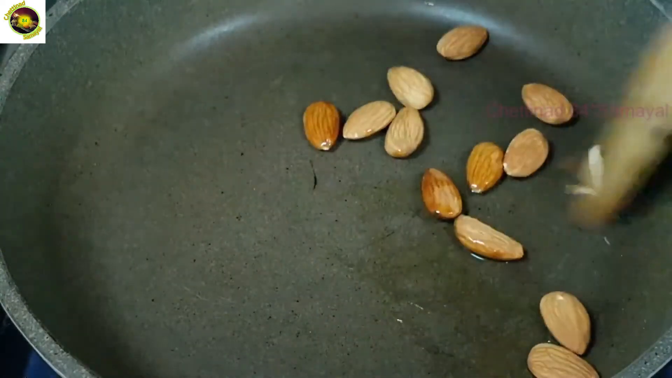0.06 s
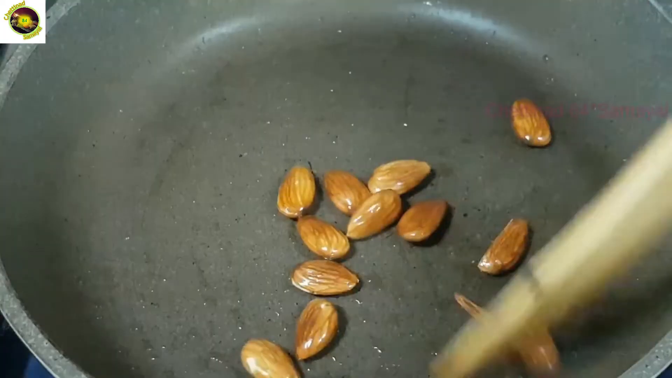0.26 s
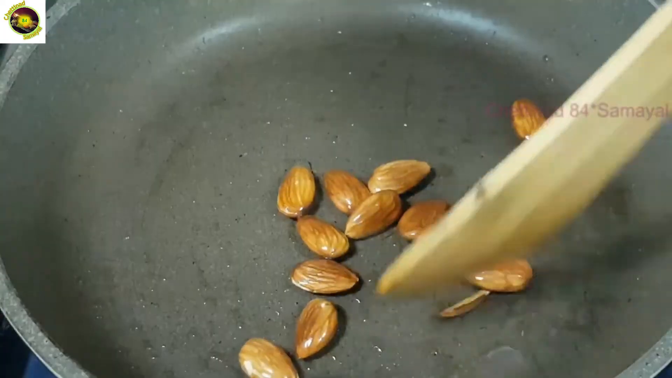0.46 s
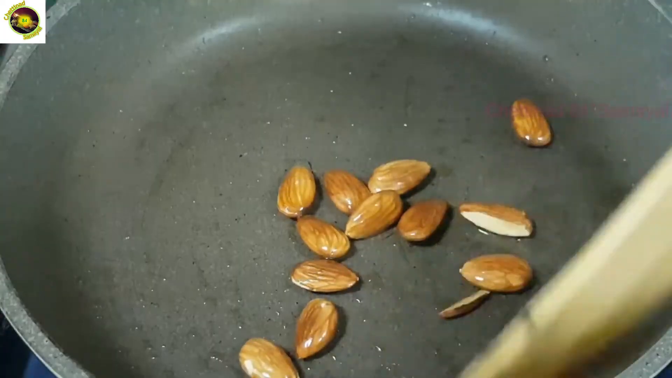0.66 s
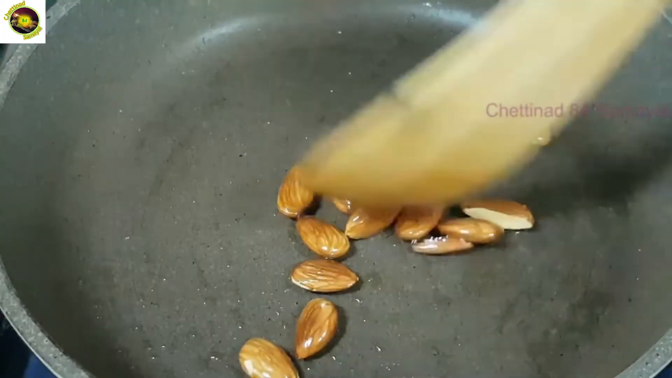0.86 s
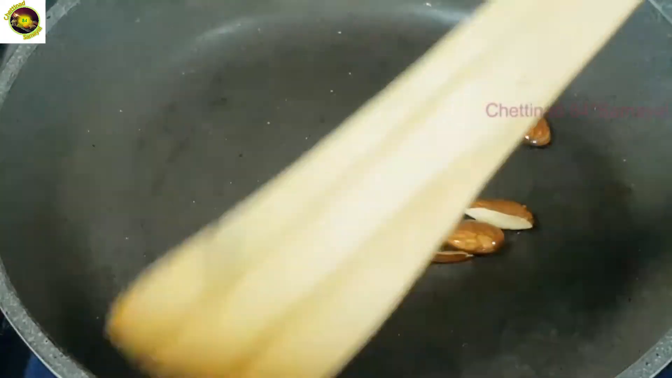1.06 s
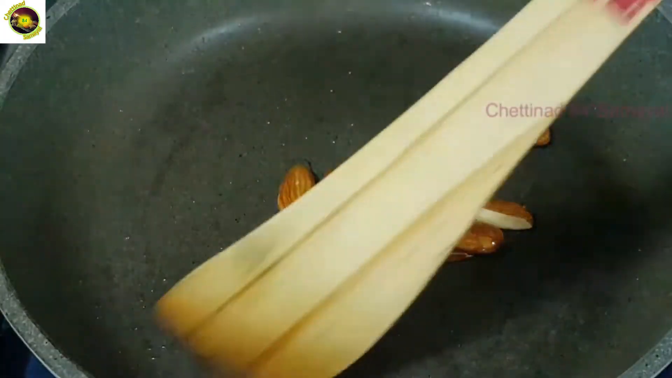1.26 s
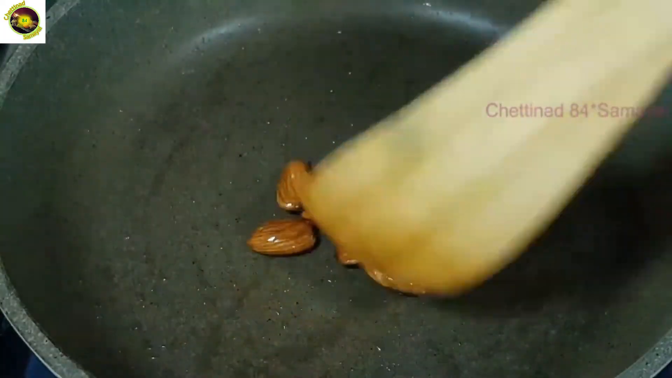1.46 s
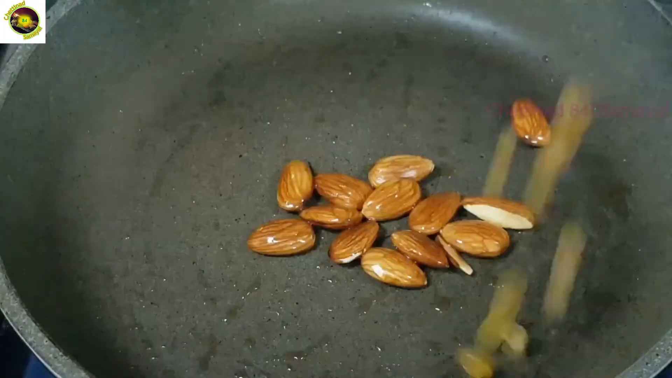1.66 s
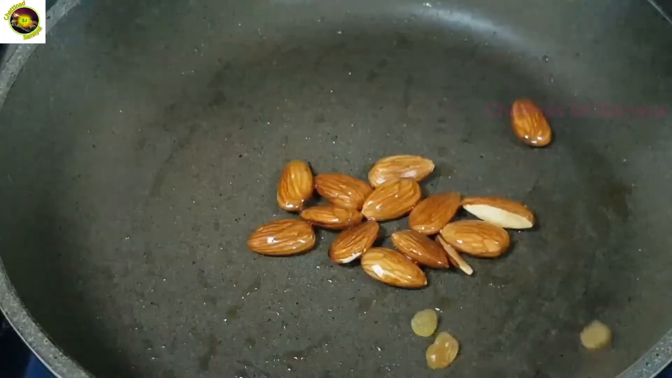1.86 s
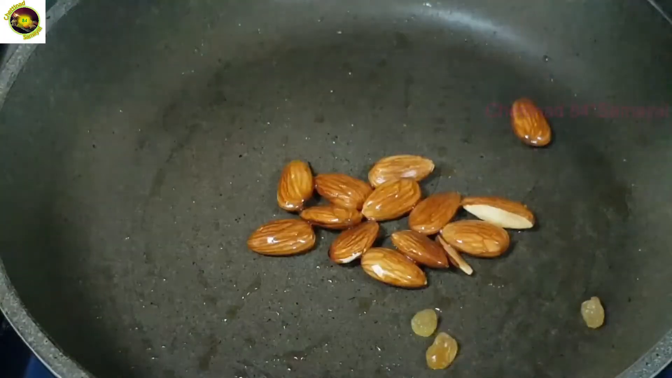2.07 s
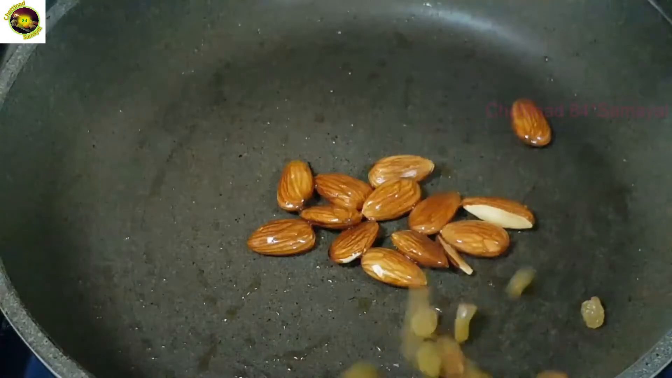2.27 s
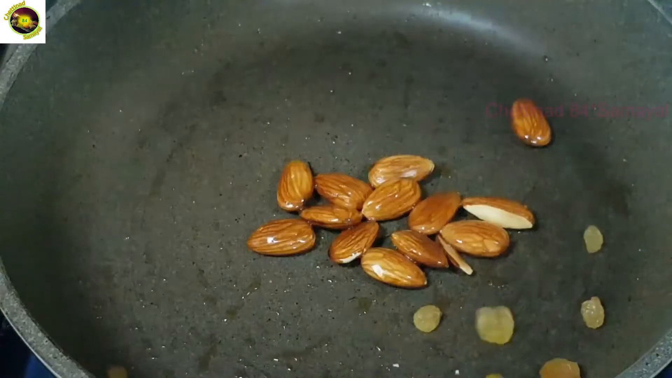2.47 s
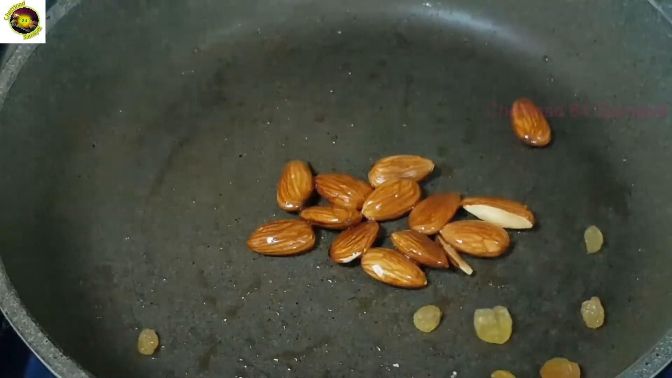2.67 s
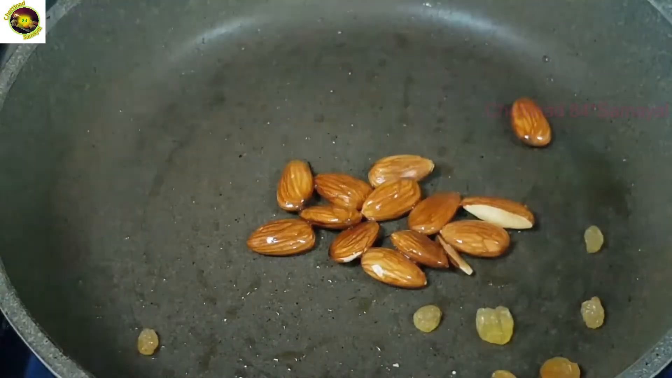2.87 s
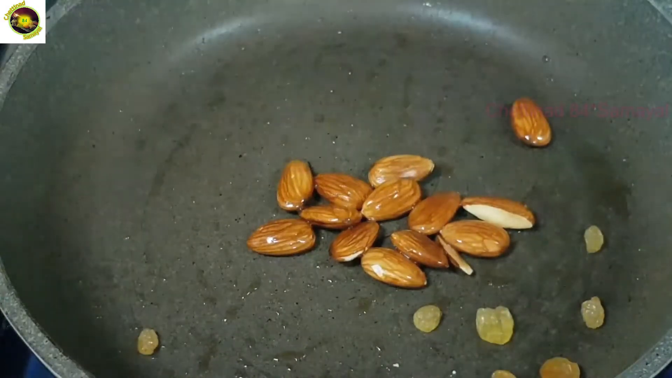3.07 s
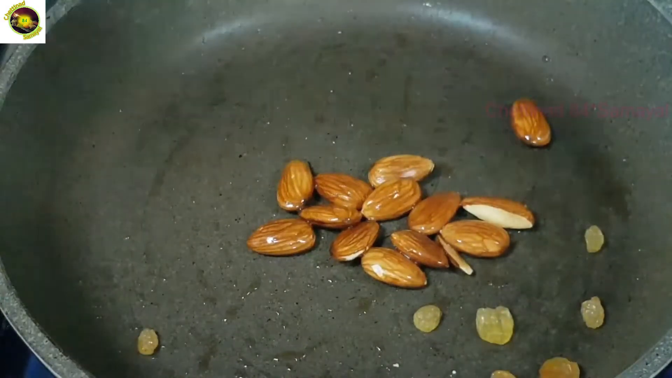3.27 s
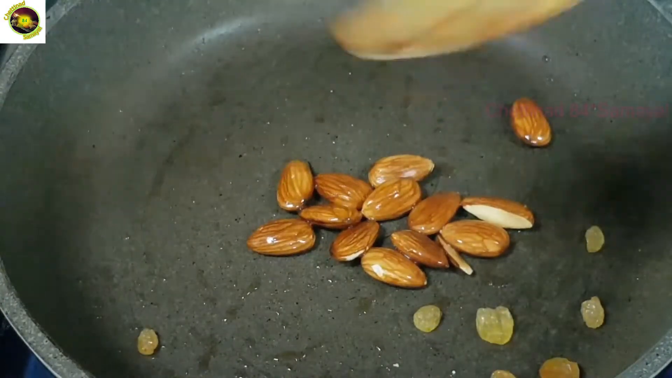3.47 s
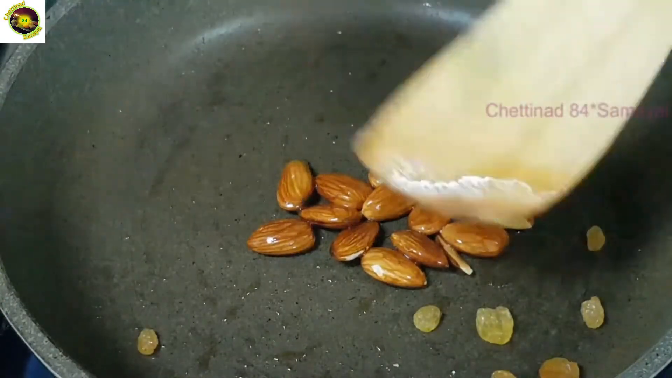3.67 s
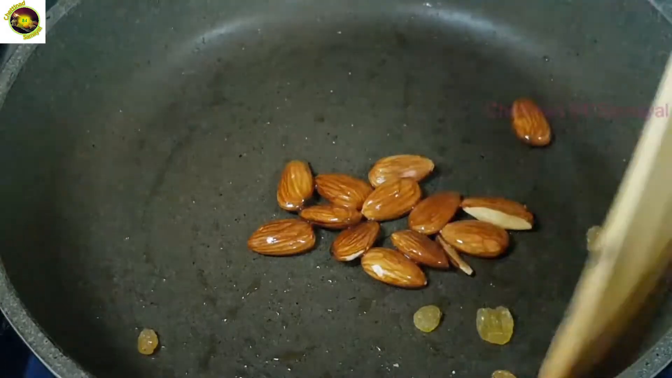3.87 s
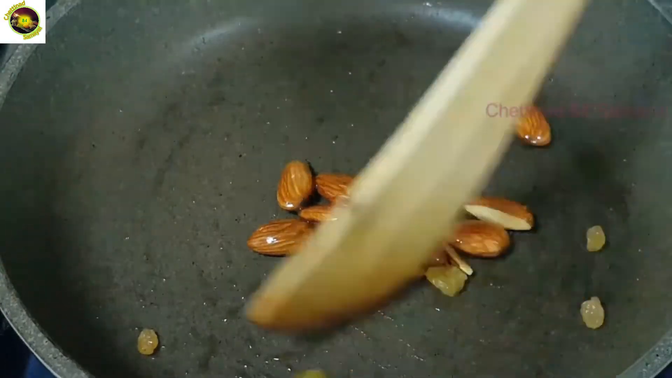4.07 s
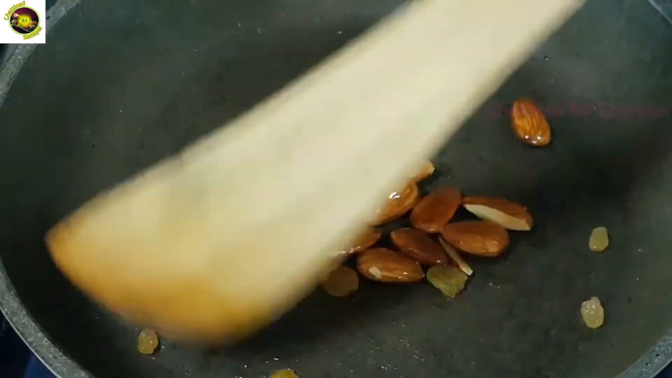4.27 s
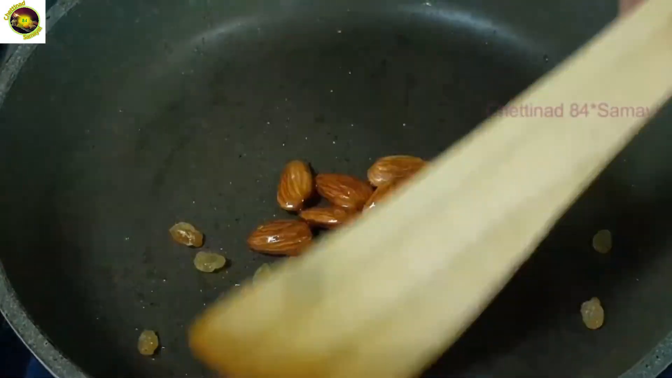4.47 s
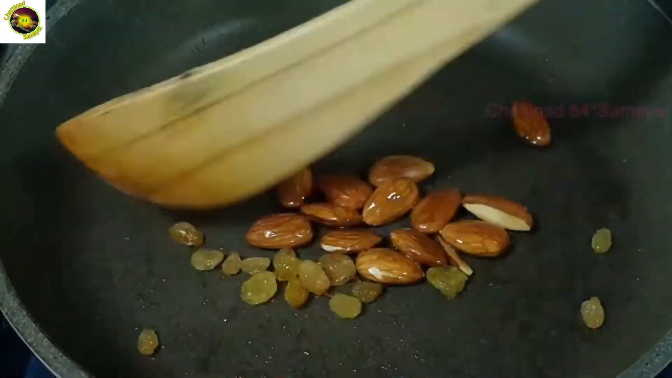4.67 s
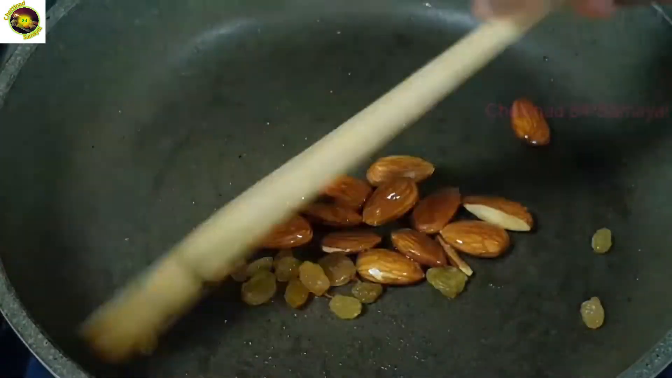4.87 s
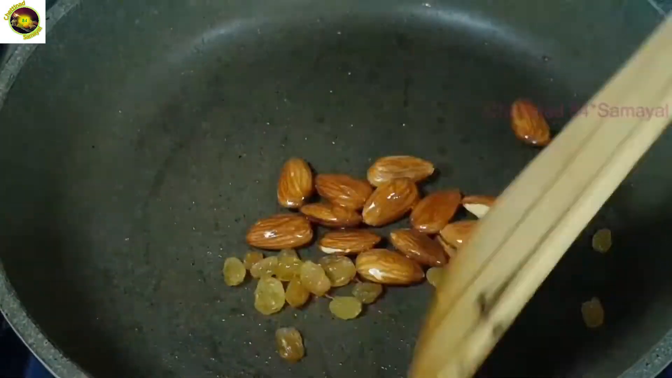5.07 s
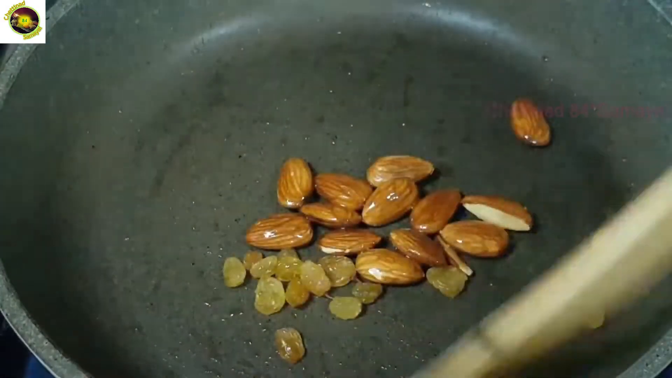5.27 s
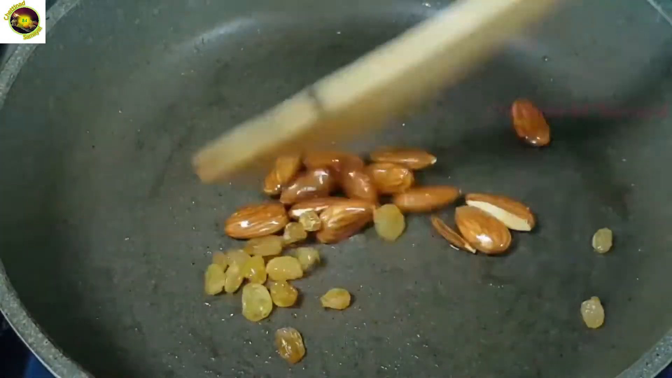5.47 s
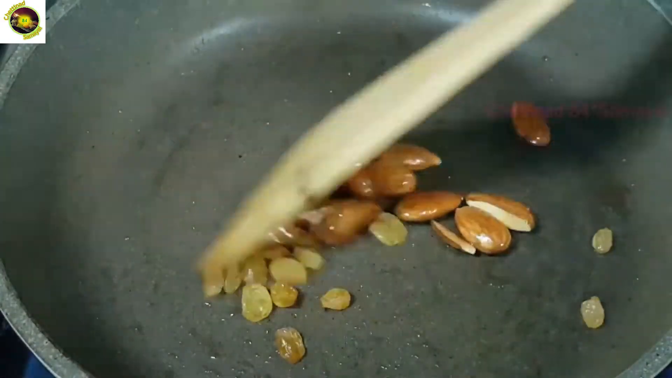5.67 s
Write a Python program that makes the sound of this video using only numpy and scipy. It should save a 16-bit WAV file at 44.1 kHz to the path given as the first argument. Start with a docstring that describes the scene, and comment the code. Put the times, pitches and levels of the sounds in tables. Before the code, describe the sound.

Close in a small kitchen, wood clacks and rasps on a resonant metal pan, small dried fruit drops, and hot fat ticks and fizzes.

```python
"""A small hard-walled kitchen, close on a thin frying pan: a wooden spatula knocks and scrapes,
almonds tumble and raisins drop in. Every contact rings the pan's decaying modes; uneven slips
make the scraping, filtered noise the sizzling fat, short high ticks the spitting in it.
A diffuse echo, faintly wavering air noise and mains hum make the place; the level dips briefly twice."""
import sys
import numpy as np
from scipy import signal
from scipy.fft import rfft, irfft
from scipy.io import wavfile
from scipy.ndimage import uniform_filter1d

SR = 44100
rng = np.random.default_rng(int(sys.argv[2]) if len(sys.argv) > 2 else 0)


def master_out(mix):
    """Clip the mix to full scale and print it as 16-bit PCM to the path in sys.argv[1]."""
    frames = np.transpose(np.atleast_2d(mix))
    ceiling = np.clip(frames, -1, 1)
    pcm = np.round(ceiling * 32767).astype(np.int16)
    wavfile.write(sys.argv[1], SR, pcm)


def gain_from_db(level_db):
    """Convert decibel levels to linear amplitude factors (20 dB per decade)."""
    decades = np.asarray(level_db, float) / 20
    return 10 ** decades


N = 251811
T = np.arange(N) / SR

# modes of the free pan: f/Hz, level/dB, t60/s
PAN = [(329.4, -19, 0.17), (383.4, -6, 0.43), (558, -20.5, 0.23), (728, -14.5, 0.14), (892, -14, 0.056),
       (932.7, -1.5, 0.29), (1023, -8, 0.076), (1029.5, -7.5, 0.051), (1401.5, -8.5, 0.1),
       (1632, -5, 0.068), (1800, -0.5, 0.24), (1896, -9.5, 0.18), (2428, -8, 0.055), (2772, -9, 0.27),
       (2869, -2.5, 0.087), (3700, -5, 0.064), (4230, -11.5, 0.63), (4540, -29, 0.26), (4630, -1, 0.08),
       (5840, -12, 0.16), (6160, -12, 0.19), (7570, -10.5, 0.25), (8500, -6, 0.1), (9150, -17, 0.088),
       (10110, -6.5, 0.045), (11700, -7.5, 0.13), (13100, -25, 0.11), (13300, -12, 0.049)]
# parts of the pan's range over which a blow shares out, by where it lands: f/Hz
STRIKE_HZ = [360, 935, 1800, 2850, 5000]
# raisins drop in and bounce: t/s, strength/dB, hardness/(dB/octave),
# change of the 935 Hz part/dB (weak near the rim)
DROPS = [(1.643, -65, 1.5, -12), (1.712, -58, 6, 10), (1.763, -43, -0.5, -10), (1.77, -54, 4.5, 1),
         (1.796, -51.5, 0, -9), (1.804, -36.5, -2, -1.5), (1.817, -54, 1.5, -2), (1.849, -55, 3.5, -10),
         (1.88, -49, 0, -4), (2.298, -40.5, 1.5, 2.5), (2.316, -45.5, 2, -1), (2.372, -49, 4, 5),
         (2.392, -61, 1.5, 12), (2.416, -54.5, 0.5, -3), (2.447, -66.5, 7.5, 9)]


def level(x, db):
    """Scale to an rms in dB."""
    return x * gain_from_db(db) / np.sqrt(np.mean(x ** 2))


def colour(x, points):
    """Causal filter from (Hz, dB) points, by the folded cepstrum."""
    hz, db = np.transpose(points)
    grid = np.linspace(1, SR / 2, 2049)
    cep = irfft(np.log(gain_from_db(np.interp(np.log(grid), np.log(hz), db))))
    cep[1:2048] *= 2
    cep[2049:] = 0
    return signal.fftconvolve(x, irfft(np.exp(rfft(cep))))[:len(x)]


def band(x, lo_hz, hi_hz):
    """Band-pass."""
    edges_hz = [lo_hz, min(hi_hz, .45 * SR)]
    return signal.sosfilt(signal.butter(2, edges_hz, "band", fs=SR, output="sos"), x)


def grains(per_s, spread_db):
    """Random clicks of either sign, a few much bigger than the rest."""
    chance = rng.random((3, N))
    happens = chance[0] < per_s / SR
    size_db = np.minimum(-spread_db * np.log(1 - chance[2]), 22)
    return happens * np.sign(chance[1] - .5) * gain_from_db(size_db)


def walk(rate):
    """Slowly wandering value, spread near 1, from random steps (rate per second) smoothed twice."""
    k = int(SR / rate)
    steps = np.repeat(rng.standard_normal(N // k + 1), k)
    return 1.5 * uniform_filter1d(uniform_filter1d(steps, k), k)[:N]


def add(out, s, x):
    """Mix x into out from time s."""
    i = int(s * SR)
    out[i:i + len(x)] += x[:N - i]


def strokes():
    """Gains of rasp, rumble and swish: each stroke of the spatula rises, holds and dies away."""
    # spatula edge dragged over the pan: t/s, length/s, rasp level/dB, rumble level/dB,
    # level of the swish of pushed fat/dB
    drags = [(0, 0.017, -68, -60, -79), (0.373, 0.11, -47.5, -55.5, -93), (.72, 0.08, -66, -69, -65.5),
             (1.195, 0.13, -72, -65.5, -59.5), (1.36, 0.088, -52, -63, -94), (3.922, 0.075, -59, -70, -64),
             (4.019, 0.18, -57, -53, -70.5), (4.483, 0.16, -51.5, -51.5, -67.5),
             (4.89, .17, -57.5, -57.5, -57), (5.076, 0.19, -56.5, -46.5, -68.5),
             (5.313, 0.078, -56.5, -49.5, -64), (5.44, 0.097, -51.5, -46, -75),
             (5.677, 0.049, -48.5, -35, -75)]
    # rise of rasp, rumble, swish: time/s
    attack_s = [0.027, 0.046, 0.023]
    # dying away of rasp, rumble, swish: time constant/s
    release_s = [0.048, 0.036, 0.046]
    gains, t = np.zeros((3, N)), T[:int(.7 * SR)]
    for s, length, *levels_db in drags:
        for gain, db, attack, release in zip(gains, levels_db, attack_s, release_s):
            rise = np.clip(t / attack, 0, 1)
            fall = np.exp(-np.maximum(t - length, 0) / release)
            add(gain, s, gain_from_db(db) * rise * fall)
    return gains


def scrape():
    """The edge sticks and slips: a rasp that rings the pan, a fat swish, a rumble of floor and grate."""
    # colour of the bare rasp: f/Hz, level/dB
    rasp_colour = [(180, -58.5), (300, -0.5), (785, -6.5), (925, -4.5), (1230, -4.5), (1840, -18.5),
                   (1920, -12.5), (3460, -34.5), (8000, -44.5), (10400, -93), (17600, -120)]
    # faint rasp, rumble and swish that stay between strokes: level/dB
    idle_db = [-72, -71, -72]
    ring_db, tilt_db = -3, -6  # ring level, and its tilt per octave about 935 Hz
    grate_hz, floor_hz = 140, 322

    rasp_gain, rumble_gain, swish_gain = strokes() + gain_from_db(np.array(idle_db))[:, None]
    judder_db = 2.2 * walk(30)
    slips = level(grains(2500, 3.96), 0) * rasp_gain * gain_from_db(judder_db)
    rasp = gain_from_db(18.0) * colour(slips, rasp_colour)

    # one two-pole resonator for each mode
    ring = np.zeros(N)
    for hz, db, t60 in PAN:
        r = np.exp(-np.log(1000) / (t60 * SR))
        angle = 2 * np.pi * hz / SR
        gain = gain_from_db(db + tilt_db * np.log2(hz / 935)) * np.sqrt(1 - r) * np.sin(angle)
        ring += gain * signal.lfilter([1], [1, -2 * r * np.cos(angle), r * r], slips)

    shake = rng.standard_normal(N) * rumble_gain * gain_from_db(1.4 * walk(25))
    rumble = gain_from_db(18.0) * band(shake, 0.64 * grate_hz, 1.374 * grate_hz)
    rumble += gain_from_db(8.5) * band(shake, 161, 256)
    rumble += gain_from_db(22) * band(shake, floor_hz - 14, floor_hz + 14)

    swish = level(band(grains(4000, 1.1), 790, 2140), 1.7) * swish_gain * gain_from_db(2.0 * walk(25.14))
    return rasp + gain_from_db(ring_db) * ring + rumble + swish


def fat():
    """Tiny bubbles sizzle; short high ticks pop, echo off the pan wall and leave a crackling fizz."""
    # swell of the frying fat: t/s, level/dB
    sizzle = [(0, -69), (.43, -71), (1.17, -72), (1.35, -66), (1.69, -70), (2.0, -71), (2.35, -65),
              (2.62, -78), (2.73, -56), (2.771, -60), (2.95, -78), (3.15, -74), (3.32, -67), (3.37, -57),
              (3.55, -76), (3.78, -61.5), (3.86, -63), (3.97, -64.5), (4.26, -62), (4.43, -62),
              (4.55, -65.5), (4.82, -63), (5.09, -58.5), (5.3, -69), (5.38, -54), (5.48, -68), (5.71, -61)]
    # colour of the bubbles: f/Hz, level/dB
    fat_colour = [(1760, -9), (3000, 1), (5090, 1), (6300, -2), (8580, 4), (9320, 1), (12400, 6),
                  (14900, 2.5), (15500, 8)]
    # short high ticks: bursting drops of water, and at 2.447 s a raisin's bright tap:
    # t/s, pop level/dB, centre f/Hz, after-fizz level against the pop/dB
    ticks = [(0.3092, -50, 8640, -24), (0.5435, -42, 8500, -37), (0.642, -44, 8400, -41),
             (0.9214, -45, 8400, -35), (1.035, -48, 7780, -31), (1.1298, -51, 8670, -33),
             (1.3553, -36.5, 6210, -12), (1.6457, -35, 8200, -20), (1.693, -45, 8500, -14),
             (1.9867, -48, 8500, -18), (2.153, -34.5, 13200, -32), (2.4469, -34, 8600, -15),
             (2.4705, -20, 12600, -23.5), (2.6206, -40.5, 8600, -21), (2.655, -16.5, 8750, -25),
             (2.6664, -39, 10800, -26), (2.697, -30, 8300, -19.5), (2.7426, -19, 9700, -17),
             (2.848, -42, 11000, -27), (2.871, -46, 12000, -33), (3.003, -42, 11000, -29),
             (2.9476, -37, 13400, -27), (2.9846, -48, 13700, -21), (3.097, -48, 12400, -27),
             (3.1323, -40.5, 12700, -26), (3.2131, -42.5, 12200, -18.5), (3.3388, -53.5, 9040, -6.5),
             (3.3643, -39, 8280, -21), (3.4094, -47, 8090, -24), (3.471, -36, 13900, -19),
             (3.48, -44, 12600, -13), (3.683, -39.5, 8270, -21.5), (3.7963, -35, 13300, -13),
             (3.8054, -26.5, 7300, -37), (3.8368, -35, 5100, -27), (3.8556, -41, 11500, -12),
             (3.9444, -41, 8470, -24), (4.0456, -34, 11700, -21), (4.0932, -30.5, 11800, -38),
             (4.3138, -26, 12000, -38.5), (4.475, -28.5, 13100, -21), (4.5186, -26.5, 14800, -27),
             (4.591, -45, 10900, -28), (4.7531, -36, 12330, -35), (4.7955, -44, 8800, -13.5),
             (4.9216, -27.5, 12300, -45), (5.098, -31.5, 13020, -19.5), (5.1754, -35.5, 8900, -15),
             (5.2655, -33.5, 12600, -26), (5.332, -45, 8050, -11), (5.453, -36, 11700, -19),
             (5.5479, -39.5, 8700, -17.5), (5.5832, -32, 13100, -24)]
    pop_s, thud_s, thud_db = .00007, 0.000096, -12
    ping_s, ping_db = 0.00043, -17
    echo_s, echo_db = 0.0037, -14
    fizz_s, hiss_s, hiss_db = 0.011, 0.11, -14  # quick fizz, and its longer hiss
    raisin_fizz_s, raisin_fizz_db = 0.048, -19  # against the raisin's strength

    s, db = np.transpose(sizzle)
    bubbles = level(rng.standard_normal(N), 0) + level(grains(500, 4.9), -3.6)
    bubbles = level(colour(bubbles, fat_colour), 0)
    flicker_db = 1.5 * walk(20)
    pops, fizz_gain, t = np.zeros(N), np.zeros(N), T[:int(.4 * SR)]
    for at, pop_db, hz, fizz_db in ticks:
        tone = np.sin(2 * np.pi * hz * t)
        pop = np.exp(-(t / pop_s - 2) ** 2) * tone
        pop -= gain_from_db(thud_db) * np.exp(-t / thud_s)
        pop += gain_from_db(ping_db) * np.exp(-t / ping_s) * tone
        add(pops, at, gain_from_db(pop_db) * pop)
        add(pops, at + echo_s, gain_from_db(pop_db + echo_db) * pop)
        decay = np.exp(-t / fizz_s) + gain_from_db(hiss_db) * np.exp(-t / hiss_s)
        add(fizz_gain, at, gain_from_db(pop_db + fizz_db) * decay)
    # moist raisins fizz in the fat
    for at, drop_db, *_ in DROPS:
        add(fizz_gain, at, gain_from_db(drop_db + raisin_fizz_db) * np.exp(-t / raisin_fizz_s))
    # fat pushed by the spatula sizzles up with the swish
    fizz_gain += strokes()[2]
    sizzle_gain = gain_from_db(np.interp(T, s, db) + flicker_db)
    return bubbles * (sizzle_gain + fizz_gain) + band(pops, 560, 17600)


def kitchen():
    """Faintly wavering air noise, as coloured noise, and a mains hum, as a wavering sine."""
    # colour of the air noise: f/Hz, level/dB
    air_colour = [(12, 2), (20, 12), (31, 5.5), (49, -11), (102, -14), (147, -33), (237, -25), (372, -7),
                  (634, -6.5), (709, 1), (794, -10.5), (5210, -26), (13200, -25), (15200, -26),
                  (16500, -41)]
    air_db, hum_hz, hum_db = -64, 99.5, -71.5
    air = level(colour(rng.standard_normal(N), air_colour), air_db) * gain_from_db(.8 * walk(6))
    hum = gain_from_db(hum_db + 2.0 * walk(17)) * np.sin(2 * np.pi * hum_hz * T)
    return air + hum


def contacts():
    """Every blow as time, level in each part of the pan's range, crack, ring share and rattle."""
    # spatula and nuts knock the pan: t/s, strength/dB, rocking of the whole pan/dB,
    # hardness/(dB/octave), wood crack level/dB
    knock_table = [(.061, -49, -67, -10, -66), (.074, -36, -75, 1, -68), (.174, -36.5, -63, -1.5, -53),
                   (.189, -31.5, -57, -10, -56), (.383, -51, -66, 8, -67), (.394, -26.5, -42.5, 2, -36),
                   (.46, -32, -55, -1.5, -64), (.703, -35.5, -45.5, -1, -40.5), (.855, -62, -84, 6, -48),
                   (0.8594, -43.5, -77, 6, -37), (1.193, -30.5, -32, 2, -25.5), (1.338, -46, -44, 4, -50),
                   (1.383, -29.5, -47, 2.5, -54), (1.439, -44, -46, 4, -52), (3.931, -34.5, -42.5, -4, -41),
                   (4.05, -35, -43, -7, -48), (4.119, -26, -41.5, 0, -44), (4.231, -45.5, -63, -18, -76),
                   (4.291, -49, -64, -17, -62), (4.435, -26, -37, 3.5, -32.5), (4.526, -37.5, -39, 1, -67),
                   (4.583, -26, -43, 2.5, -50), (4.639, -34, -59, -9, -65), (4.746, -48, -65, -10, -77),
                   (4.86, -49, -50.5, -3, -53), (4.896, -30, -37, 1, -34.5), (5.13, -25.5, -43, 1, -52),
                   (5.192, -37.5, -50, -5, -52), (5.239, -51, -71, 14, -43.5),
                   (5.332, -23.5, -41.5, -7.5, -34.5), (5.409, -51, -46, -13, -47),
                   (5.435, -25.5, -41, 2.5, -49), (5.488, -27.5, -58, -19, -58),
                   (5.599, -42.5, -67, -6, -59), (5.68, -24.5, -72, 8, -23)]
    # share of a knock above the rocking part, dull like the spatula edge: level/dB
    knock_share_db = [-0.5, -10, -20.5, -45.5]
    # share of a falling raisin, small and bright: level/dB
    drop_share_db = [-1.5, 2, -0.5, -10.5]
    knock_ring, drop_ring = 0.75, 1.1  # share of the free ring time
    knock_rattle_db, drop_rattle_db = -15, -6  # against the crack
    drop_rock_db, drop_crack_db = -20.5, -6  # against the raisin's strength

    octaves = np.log2(np.array(STRIKE_HZ[1:]) / STRIKE_HZ[1])
    hits = []
    for s, db, rock_db, hard, crack_db in knock_table:
        upper_db = db + np.array(knock_share_db) + hard * octaves
        hits.append((s, [rock_db, *upper_db], crack_db, knock_ring, knock_rattle_db))
    for s, db, hard, spot_db in DROPS:
        upper_db = db + np.array(drop_share_db) + hard * octaves + [spot_db, 0, 0, 0]
        parts_db = [db + drop_rock_db, *upper_db]
        hits.append((s, parts_db, db + drop_crack_db, drop_ring, drop_rattle_db))
    return hits


def blows():
    """Each blow rings all modes in its own colour, mostly damped later; the wood cracks and rattles."""
    # sudden changes of the ringing level, mostly damped by the spatula, sometimes louder:
    # t/s, change/dB
    ring_changes = [(.145, -21), (.26, -19), (.495, -13), (.73, 0), (.774, -9), (.867, -4), (1.235, 5.5),
                    (1.394, -3), (3.96, -4.5), (4.133, -4), (4.478, -16), (4.596, -12.5), (4.653, -22),
                    (4.929, -18), (5.143, -7), (5.372, -25), (5.447, -1.5), (5.531, 3), (5.56, -18.5)]
    # modes of the wooden spatula: f/Hz, level/dB, t60/s
    spatula = [(780, -40, 0.1), (1220, -13, 0.1), (1515, -5.5, 0.049), (2083, -11, 0.028),
               (2360, -18, 0.023), (3500, -40, 0.016)]
    scatter_db, detune = 2.05, 0.0021  # random spread of each mode's level and relative pitch
    rough_db, flutter = 3.0, .03  # waver depth at 4 kHz, and waver rate per Hz of the mode
    rise_s, change_s, crack_s, rattle_s = 0.00097, 0.0018, 0.0051, 0.074
    crack_gain_db, knock_db = 6, -4  # the wood's knock is set against its crack

    out, t = np.zeros(N), T[:int(.3 * SR)]
    knock_t = t[:2048]
    hz, db, t60 = np.transpose(PAN)[:, :, None]
    # each ring wavers at random in level, the higher the faster and deeper
    waver = np.array([gain_from_db(rough_db * np.sqrt(f / 4000) * walk(flutter * f)) for f in hz[:, 0]])
    knock = np.zeros(len(knock_t))
    for f, g, d in spatula:
        knock += gain_from_db(g) * np.exp(-np.log(1000) * knock_t / d) * np.sin(2 * np.pi * f * knock_t)

    for s, parts_db, crack_db, ring, rattle_db in contacts():
        chance = rng.standard_normal((2, len(PAN), 1))
        noise = rng.standard_normal(len(t))
        share_db = np.interp(np.log(hz), np.log(STRIKE_HZ), parts_db)
        size = gain_from_db(db + share_db + scatter_db * chance[0])
        decay = np.exp(-np.log(1000) * t / (t60 * ring))
        i = min(int(s * SR), N - len(t))
        phase = 2 * np.pi * hz * (1 + detune * chance[1]) * t
        modes = size * decay * waver[:, i:i + len(t)] * np.sin(phase.astype(np.float32))

        total_db = np.zeros(len(t))
        for at, change_db in ring_changes:
            if s < at < s + t[-1]:
                total_db += change_db * np.clip((s + t - at) / change_s, 0, 1)
        # the two lowest modes rock the whole pan and are changed less
        rocking = gain_from_db(0.67 * total_db) * modes[:2].sum(axis=0)
        ringing = gain_from_db(total_db) * modes[2:].sum(axis=0)
        add(out, s, (1 - np.exp(-t / rise_s)) * (rocking + ringing))

        add(out, s, gain_from_db(crack_db + crack_gain_db + knock_db) * knock)
        crack = band(noise * np.exp(-t / crack_s), 1030, 3040)
        loose = noise * np.exp(-t / rattle_s)
        rattle = band(loose, 640, 1980) + gain_from_db(-13.5) * band(loose, 2750, 6600)
        add(out, s, gain_from_db(crack_db + crack_gain_db) * (crack + gain_from_db(rattle_db) * rattle))
    return out


def room(x):
    """Diffuse echo of a small hard room: decaying noise, the treble dying first."""
    echo_db, t60_s, treble_t60_s, build_s = -12, 0.62, 0.24, 0.0091
    t = T[:int(.7 * SR)]
    noise = rng.standard_normal(len(t)) * np.clip(t / build_s, 0, 1)
    low = band(noise, 80, 3300)
    tail = low * gain_from_db(-60 * t / t60_s) + (noise - low) * gain_from_db(-60 * t / treble_t60_s)
    return gain_from_db(echo_db) * signal.fftconvolve(x, tail / np.sqrt(np.sum(tail ** 2)))[:N]


def scene():
    """Pan and fat close by, their echo, and the kitchen."""
    near = scrape() + fat() + blows()
    return (near + room(near) + kitchen())[None]


def band_limit(x):
    """A steep low-pass at the top of the band."""
    return signal.sosfilt(signal.butter(12, 16830, fs=SR, output="sos"), x)


def record(dry):
    """Brief dips of the level, then the overall colour with its steep treble cut."""
    # the level dips briefly: t/s, half width/s, depth/dB
    dips = [(0.052, 0.015, -11.5), (1.621, 0.009, -21)]
    # overall colour, with a steep treble cut near 15.8 kHz: f/Hz, level/dB
    overall_colour = [(25, -17.5), (60, 0), (7600, -2.5), (8400, 0.5), (9200, -3), (15650, -5.5),
                      (15950, -33), (17000, -40)]
    dip_db = sum(db * np.clip(1 - abs(T - s) / half, 0, 1) for s, half, db in dips)
    mix = colour(dry[0] * gain_from_db(dip_db), overall_colour)[None]
    return band_limit(mix)


dry = scene()
out = record(dry)
master_out(out)
```